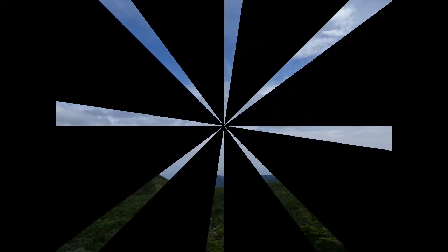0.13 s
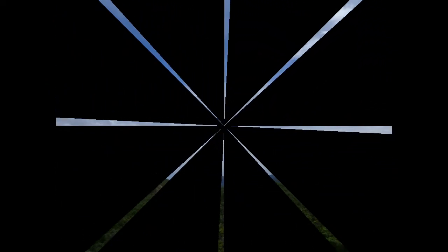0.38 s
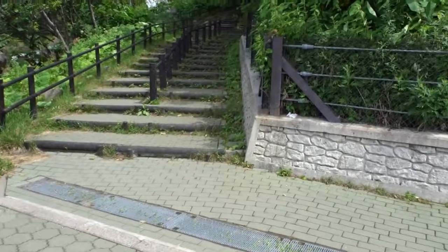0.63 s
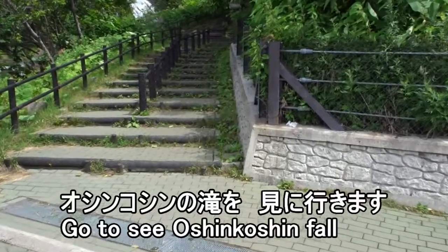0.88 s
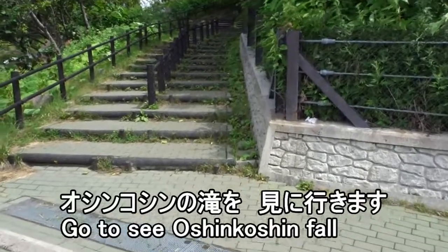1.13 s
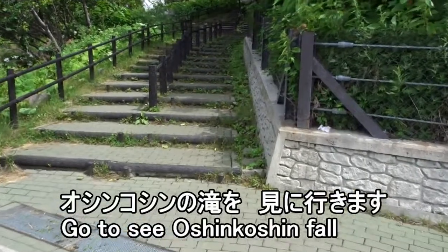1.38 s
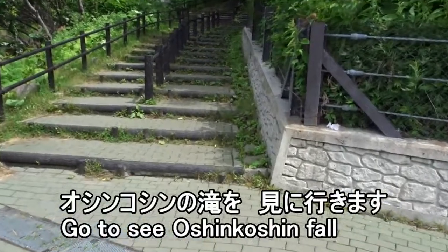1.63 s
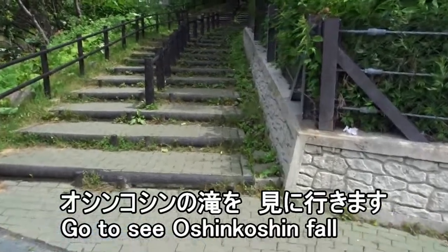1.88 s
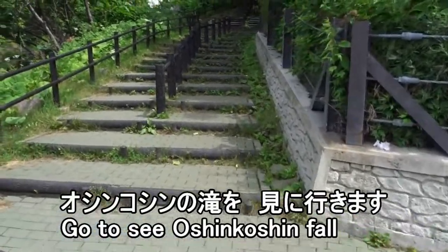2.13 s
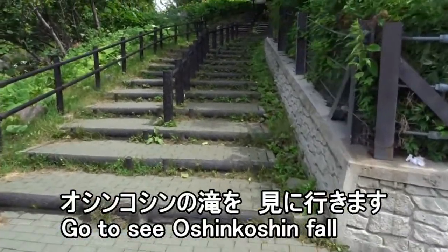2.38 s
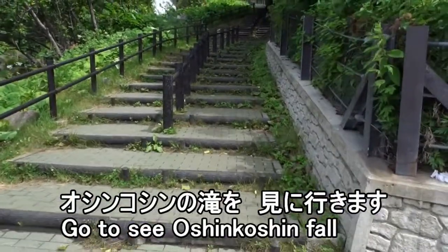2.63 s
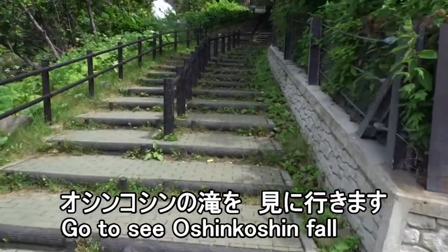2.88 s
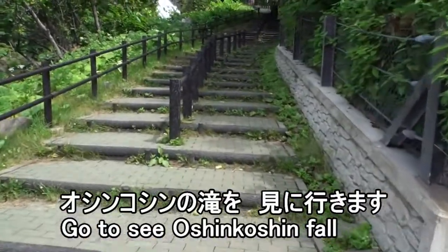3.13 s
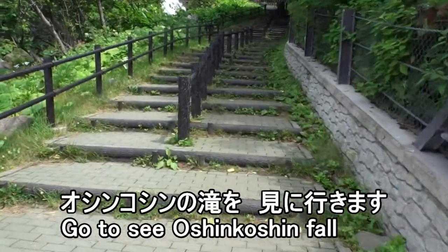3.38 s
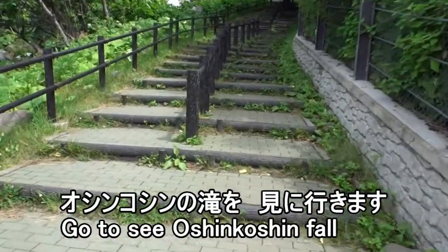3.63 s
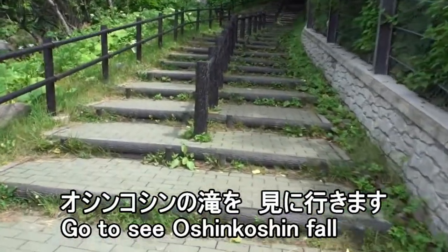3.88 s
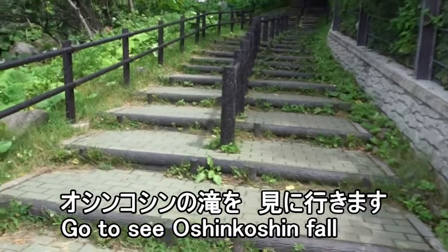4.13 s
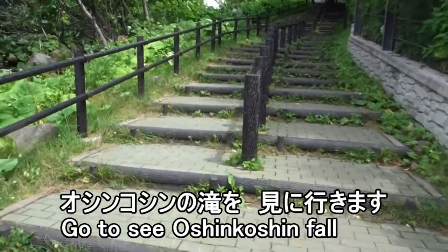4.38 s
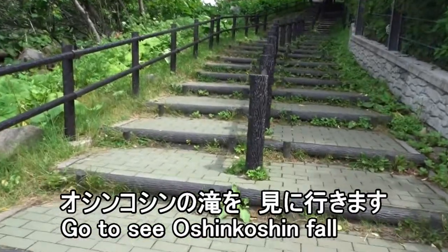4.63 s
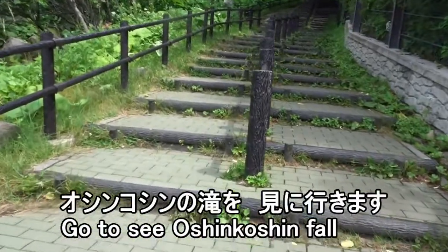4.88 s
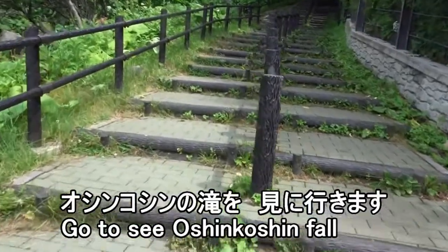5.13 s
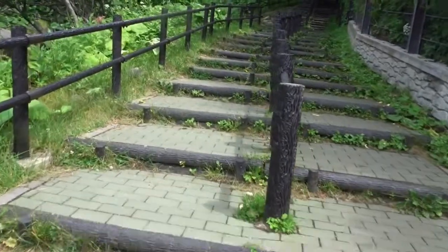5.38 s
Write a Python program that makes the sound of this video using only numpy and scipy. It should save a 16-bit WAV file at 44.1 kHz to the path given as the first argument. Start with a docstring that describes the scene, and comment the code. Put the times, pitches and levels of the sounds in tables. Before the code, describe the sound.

After half a second of silence, a large nearby waterfall cuts in abruptly, roaring and hissing steadily, slightly left, with a brief wind buffet at first.

```python
"""A large waterfall, a little to the left, heard while walking up steps towards it, cutting in after silence.
The plunge pool rumbles and trapped air roars; water rushes over rock and spray hisses: all patchy or surging
noise, with bubble rings in all but the rumble. The spray brightens as its path through air shortens.
A short gust of low noise buffets the microphone ports at first, a dry tick of noise sounds close by,
and a low sine hums under it all, wavering in pitch and strength."""
import sys
import numpy as np
from scipy import signal
from scipy.fft import rfft, irfft, next_fast_len
from scipy.io import wavfile
from scipy.ndimage import uniform_filter1d, map_coordinates

SR = 44100
rng = np.random.default_rng(int(sys.argv[2]) if len(sys.argv) > 2 else 0)


def volts_from_decibels(level):
    """Turn decibel levels (scalar or array-like) into linear amplitude factors."""
    exponent = np.asarray(level, float) / 20
    return 10 ** exponent


def materialize(psi):
    """Save the field psi as 16-bit PCM at rate SR to the path in sys.argv[1].

    A 1-D psi becomes a single channel; in a 2-D psi each row is a channel.
    """
    bounded = np.clip(np.atleast_2d(psi).T, -1, 1)
    quanta = np.round(bounded * 32767).astype(np.int16)
    wavfile.write(sys.argv[1], SR, quanta)


N = 242991  # length [samples]


def unit(x):
    """Normalisation: scales a signal to a root mean square of one."""
    return x / np.sqrt(np.mean(x ** 2) + 1e-20)


def along(points, hz):
    """Logarithmic frequency scale: interpolates (frequency [Hz], value) points along it."""
    f, v = np.transpose(points)
    return np.interp(np.log(hz + 1), np.log(f + 1), v)


def curve(rows):
    """Linear interpolation in time: one value per sample from (time [s], value) rows."""
    s, value = np.transpose(rows)
    return np.interp(np.arange(N) / SR, s, value)


def wobble(rate_hz):
    """Band-limited random fluctuation: a smooth spline through rate_hz random knots a second."""
    return map_coordinates(rng.standard_normal(400), [np.arange(N) * rate_hz / SR])


def swells(rows, rise_s, fall_s):
    """Exponential growth and decay about each (time [s], peak level [dB]); the events add in power."""
    s, db = np.transpose(rows)[..., None]
    late = np.arange(N) / SR - s
    decay = np.exp(-2 * np.maximum(late / fall_s, -late / rise_s))
    return np.sqrt(np.sum(volts_from_decibels(2 * db) * decay, axis=0))


def filtered(x, response):
    """Linear filtering: multiplies the spectrum by a complex response of frequency."""
    m = next_fast_len(N + 8192)
    return irfft(rfft(x, m) * response(np.fft.rfftfreq(m, 1 / SR)), m)[..., :N]


def retouched(x, gain_db):
    """Time-varying filtering: a short-time spectrum under a gain [dB] of frequency and time."""
    hz, s, z = signal.stft(x, SR, nperseg=512)
    return signal.istft(z * volts_from_decibels(gain_db(hz[:, None], s)), SR, nperseg=512)[1][..., :N]


def leaned(x, slope_db, centre_hz):
    """Spectral tilt: a slope [dB per octave] that changes in time, within an octave of the centre."""
    octaves = lambda hz: np.clip(np.log2((hz + 1) / centre_hz), -1, 1)
    return retouched(x, lambda hz, s: octaves(hz) * np.interp(s, np.arange(N) / SR, slope_db))


def patches(shape):
    """Local correlation: a random field, smooth over some hundred Hz and some tens of ms."""
    field = uniform_filter1d(rng.standard_normal(shape), size=6, axis=0)
    return unit(uniform_filter1d(field, size=12, axis=1))


def bubbles(hz, spread, cycles, size_db, count):
    """Bubble resonance: two unrelated swarms of short rings that start softly and rise in pitch."""
    draw = rng.random((count, 3))
    pitch_hz = hz * np.exp(spread * rng.standard_normal(count))[:, None]
    turns = pitch_hz * np.arange(256) / SR
    phase = 2 * np.pi * turns * (1 + 0.11 * turns / cycles)
    ring = np.sin(phase) * turns * np.exp(-3 * turns / cycles)
    size = volts_from_decibels(-size_db * np.log(draw[:, 1:2]))
    at = ((draw[:, :1] * N).astype(int) + np.arange(256)) % N
    at = at + N * (draw[:, 2:] > 1 / 2)  # about half the bubbles go to the second swarm
    return unit(np.bincount(at.ravel(), (ring * size).ravel(), 2 * N).reshape(2, N))


# how alike the sound is at the two ports: (frequency [Hz], left-right correlation [0 to 1])
PORT_LIKENESS = [(60, 0.99), (180, 1), (400, 1), (750, 0.98), (1200, 0.77), (1700, 0.61), (2900, 0.77),
                 (4300, 0.51), (5600, 0.32), (9000, .3), (12000, .15)]


def water(colour, patchy_db, swarm=0, share=0):
    """Partial coherence: patchy noise and a power share of bubbles, spread over sum and difference."""
    noise = retouched(rng.standard_normal((2, N)), lambda hz, s: patchy_db * patches((len(hz), len(s))))
    # an angle whose cosine and sine weight the sum and the difference of the ports
    turn = lambda hz: np.arccos(np.clip(along(PORT_LIKENESS, hz), 0, 1)) / 2
    tint = lambda hz: volts_from_decibels(along(colour, hz)) * [np.cos(turn(hz)), np.sin(turn(hz))]
    mid, side = np.sqrt(1 - share) * unit(filtered(noise, tint))
    if share:
        more_mid, more_side = np.sqrt(share) * unit(filtered(swarm, tint))
        mid, side = mid + more_mid, side + more_side
    return np.array([mid + side, mid - side]) / np.sqrt(np.mean(mid ** 2))


# slow swells of the low hum: (time [s], peak level before the waver [dB])
HUM_SWELLS = [(.81, -36), (1.52, -34), (2.43, -42), (2.99, -42), (3.7, -40), (4.26, -36), (4.6, -37),
              (5.2, -39)]


def hum():
    """Frequency and amplitude modulation: a low sine wavers in pitch and comes in slow swells."""
    rest_db = -59
    pitch_hz = 50 + 0.86 * wobble(5)
    strength = volts_from_decibels(rest_db) + swells(HUM_SWELLS, rise_s=0.27, fall_s=0.16)
    return strength * volts_from_decibels(1.5 * wobble(6)) * np.sin(2 * np.pi * np.cumsum(pitch_hz) / SR)


# dry ticks close by: (time [s], starting level before the filter [dB])
TICKS = [(0.7177, -15)]


def ticks():
    """Impulsive noise: each tick is a few milliseconds of bright crackle through a band-pass."""
    decay_60db_s, centre_hz, width_hz = 0.021, 6500, 7000
    out, t = np.zeros((2, N)), np.arange(400) / SR
    for s, db in TICKS:
        out[:, round(s * SR):][:, :400] += volts_from_decibels(db - 60 * t / decay_60db_s) * rng.standard_normal(400)
    band = lambda hz: 1j * hz * width_hz / (centre_hz ** 2 - hz ** 2 + 1j * hz * width_hz)
    return filtered(out, lambda hz: band(hz) ** 4)


# colour of the wind noise: (frequency [Hz], relative density [dB per Hz])
BUFFET_COLOUR = [(25, -120), (40, -18), (90, -6.5), (150, 0), (250, -6), (400, -11), (650, -7),
                 (1200, -120)]
# puffs of wind on the ports: (time [s], peak of the envelope [dB])
PUFFS = [(.62, -22.5), (.68, -27), (.745, -22.5), (.79, -26), (1.02, -33)]


def gust():
    """Turbulent pressure: eddies push on both ports together and on each separately, in lumps."""
    lumps = volts_from_decibels(1.1 * np.array([wobble(25.6), wobble(26.0), wobble(24.0)]))
    noise = filtered(rng.standard_normal((3, N)), lambda hz: volts_from_decibels(along(BUFFET_COLOUR, hz)))
    both, *each = unit(lumps * noise)
    return swells(PUFFS, rise_s=.025, fall_s=0.033) * (np.array(each) + 1.1 * both)


# colour of the spray: (frequency [Hz], relative density [dB per Hz])
SPRAY_COLOUR = [(1000, -120), (1800, -10), (2800, -4.5), (4000, -4), (6000, -6.5), (9000, -10),
                (12000, -14), (14000, -16), (16000, -18.5)]


def spray(swell_db):
    """Atmospheric absorption: hissing spray brightens as its path through air shortens."""
    level_db, follows = -26.5, 0.76  # follows: share of the roar's swell
    air_db_per_m = .14  # at 10 kHz, growing with the square of frequency
    start_m, pace_m_per_s = 24.4, 4.5
    swarm = bubbles(6060, 0.715, 2.5, 0.83, count=16000)
    hiss = water(SPRAY_COLOUR, patchy_db=0.5, swarm=swarm, share=0.1)
    hiss = volts_from_decibels(level_db + follows * swell_db + 0.46 * wobble(12)) * hiss
    path_m = lambda s: np.maximum(start_m - pace_m_per_s * s, 0)
    return retouched(hiss, lambda hz, s: -air_db_per_m * (hz / 1e4) ** 2 * path_m(s))


# colour of the water over rock: (frequency [Hz], relative density [dB per Hz])
RUSH_COLOUR = [(500, -120), (900, -11), (1300, -4.5), (1700, -5.5), (2200, -7.5), (3200, -11.5),
               (6000, -120)]


def rush(swell_db):
    """Shadowing: water rushing over rock steps up late, as if no longer shaded."""
    level_db, follows = -29, .1  # follows: share of the roar's swell
    opens_s, opens_over_s, opens_db = 4.64, 0.086, 3
    t = np.arange(N) / SR
    opened_db = opens_db / (1 + np.exp((opens_s - t) / opens_over_s))
    swarm = bubbles(1748, 0.407, 6.6, 1.1, count=12000)
    flow = water(RUSH_COLOUR, patchy_db=0.95, swarm=swarm, share=0.085)
    return volts_from_decibels(level_db + follows * swell_db + opened_db + 0.22 * wobble(6.1)) * flow


# colour of the trapped air: (frequency [Hz], relative density [dB per Hz])
ROAR_COLOUR = [(120, -120), (220, -6.5), (340, 0), (450, -1.5), (750, 0), (1000, -2), (1250, -8),
               (2000, -18.5), (4000, -120)]
# the weight drifts between the upper and lower part: (time [s], slope [dB per octave])
ROAR_LEAN = [(.8, .5), (2.1, 0.5), (2.55, 2.3), (3.1, 0.5), (3.9, -0.2), (4.4, -3), (4.8, 0)]


def roar(swell_db, surge):
    """Trapped-air resonance: patchy noise with larger bubbles roars under a drifting tilt."""
    level_db = -24.5
    swarm = bubbles(710, 0.52, 5.0, 1.5, count=12000)
    air = water(ROAR_COLOUR, patchy_db=0.55, swarm=swarm, share=0.088)
    air = volts_from_decibels(level_db + swell_db + 0.12 * surge) * air
    return leaned(air, curve(ROAR_LEAN), centre_hz=644)


# colour of the plunge pool: (frequency [Hz], relative density [dB per Hz])
PLUNGE_COLOUR = [(20, -120), (28, -16), (60, -7.5), (100, -2), (200, -0.5), (300, -3.5), (500, -34),
                 (900, -120)]
# slope of the rumble's spectrum: starts weighted low, then tilts slightly up:
# (time [s], slope [dB per octave])
PLUNGE_LEAN = [(.9, -3.5), (1.4, 0.8)]


def plunge(swell_db, surge):
    """Impact noise: the plunge pool rumbles, rising and falling with the surge."""
    level_db, follows = -29, .7  # follows: share of the roar's swell
    rumble = water(PLUNGE_COLOUR, patchy_db=0.0)
    rumble = volts_from_decibels(level_db + follows * swell_db + 0.88 * surge) * rumble
    return leaned(rumble, curve(PLUNGE_LEAN), centre_hz=141)


# the fall swells and grows as one walks nearer: (time [s], gain of the roar [dB])
SWELL = [(.75, -1.5), (1.2, -0.5), (1.95, 0), (2.5, 0), (3.3, -.5), (4.0, 1), (4.5, 1.5), (5.3, 1.5)]
# level difference of the ports: (frequency [Hz], left minus right [dB])
LEFTWARD = [(150, 0), (250, .9), (400, 2.4), (700, 4.2), (1300, 4.6), (2400, 3.2), (4400, 1.9), (8000, .1),
            (11000, -1.5), (15000, -1.4)]
# the left port hears the fall first: (frequency [Hz], phase lead [rad])
LEFT_LEAD = [(0, 0), (1300, .45), (3000, .45), (6000, 1.75), (10000, 3.1), (13500, 5.6), (16000, 6.5)]


def fall():
    """Superposition and interaural cues: four parts add, then level and phase set them leftward."""
    swell_db = curve(SWELL)
    surge = wobble(6.18)  # slabs of water land unevenly
    parts = spray(swell_db) + rush(swell_db) + roar(swell_db, surge) + plunge(swell_db, surge)
    sides = np.array([[1], [-1]]) / 2  # half of each difference to either port
    level = lambda hz: volts_from_decibels(sides * along(LEFTWARD, hz))
    phase = lambda hz: np.exp(1j * sides * np.interp(hz, *np.transpose(LEFT_LEAD)))
    return filtered(parts, lambda hz: level(hz) * phase(hz))


def scene():
    """Superposition: the pressures of all sources add."""
    return hum() + ticks() + gust() + fall()


def low_pass(x):
    """Removes everything above the highest recorded frequency."""
    return signal.sosfilt(signal.butter(12, 17060, fs=SR, output="sos"), x)


def record(dry):
    """Gating and band limitation: silence until the sound cuts in, then a steep low-pass."""
    cut_in_s, top_hz = .5406, 15720
    gated = dry * (np.arange(N) >= cut_in_s * SR)
    heard = filtered(gated, lambda hz: hz < top_hz)
    return low_pass(heard)


dry = scene()
out = record(dry)
materialize(out)
```